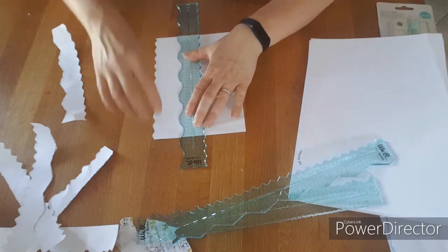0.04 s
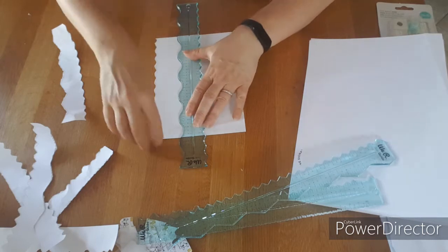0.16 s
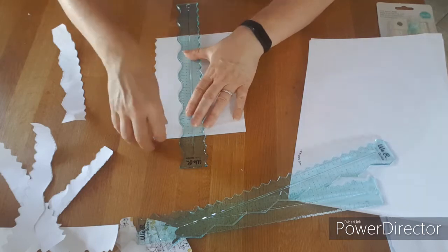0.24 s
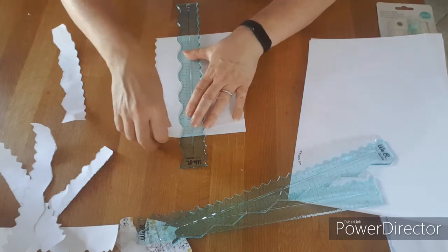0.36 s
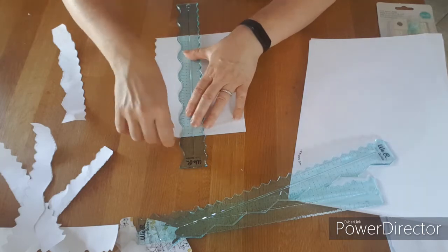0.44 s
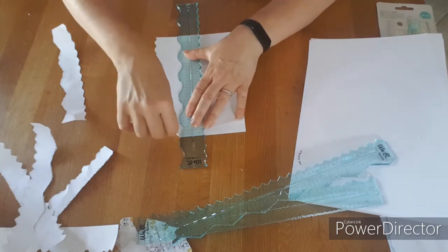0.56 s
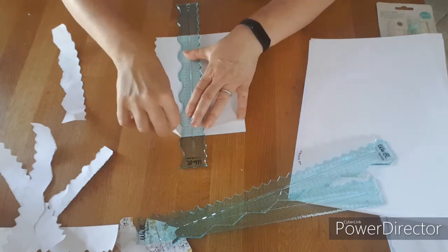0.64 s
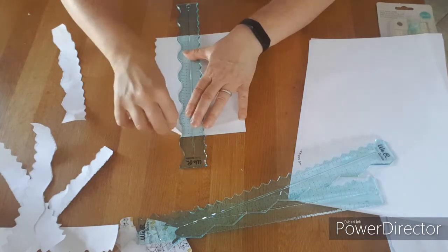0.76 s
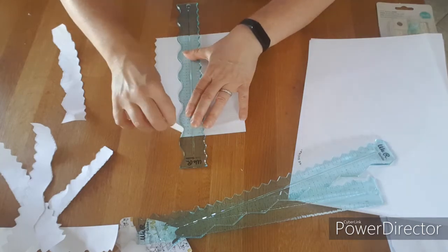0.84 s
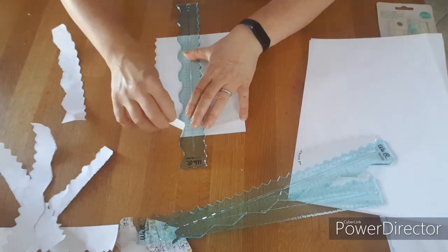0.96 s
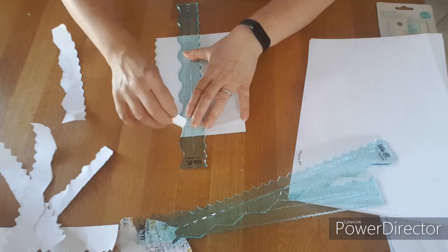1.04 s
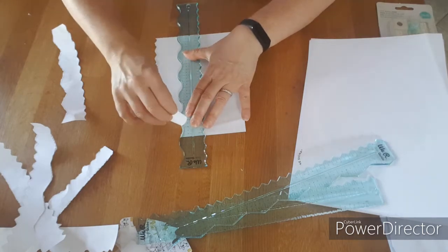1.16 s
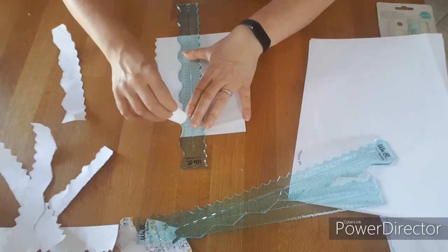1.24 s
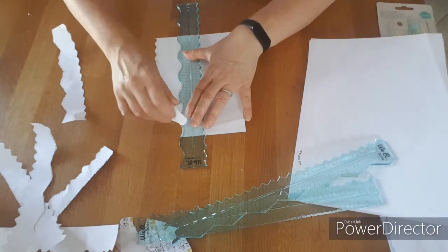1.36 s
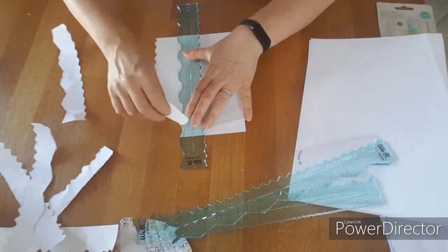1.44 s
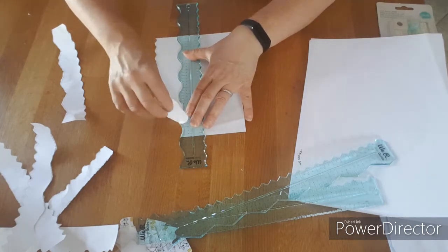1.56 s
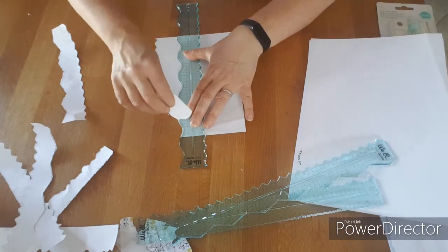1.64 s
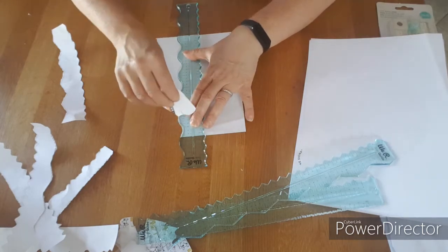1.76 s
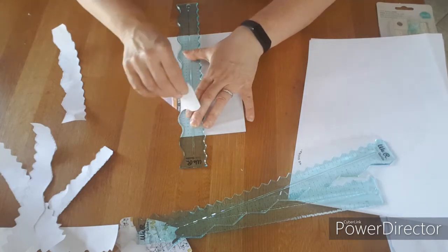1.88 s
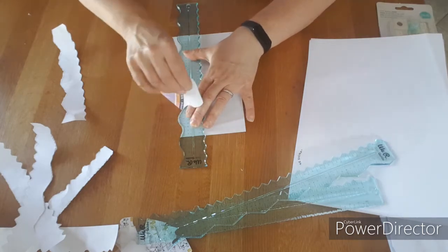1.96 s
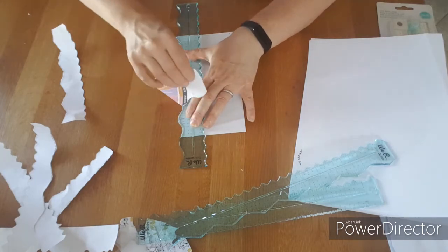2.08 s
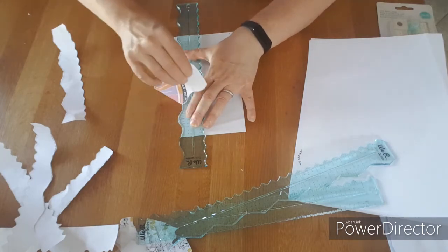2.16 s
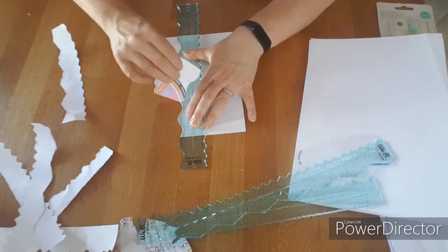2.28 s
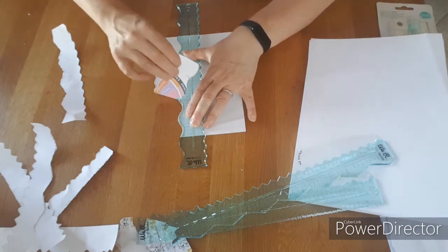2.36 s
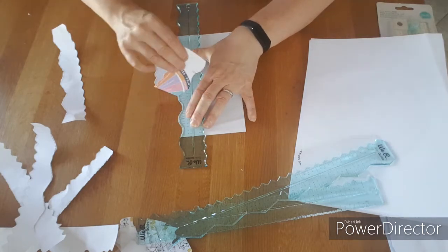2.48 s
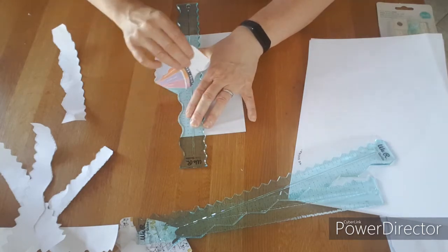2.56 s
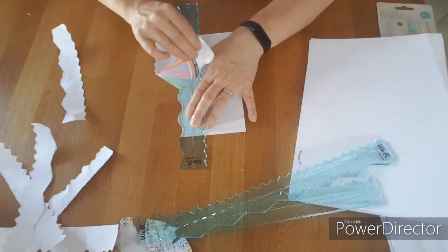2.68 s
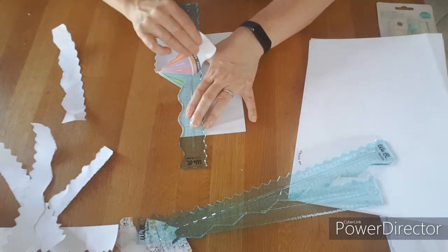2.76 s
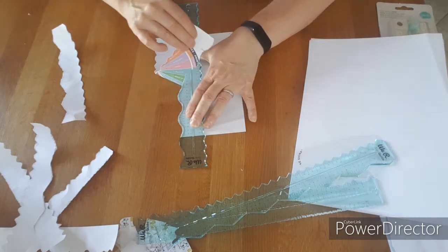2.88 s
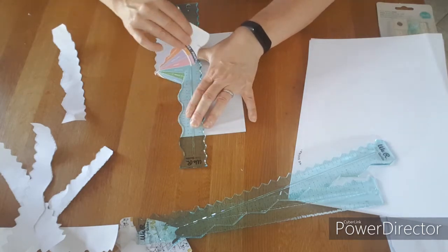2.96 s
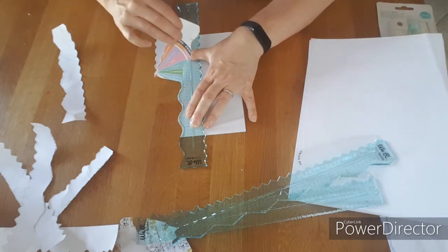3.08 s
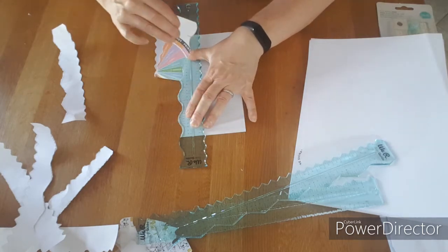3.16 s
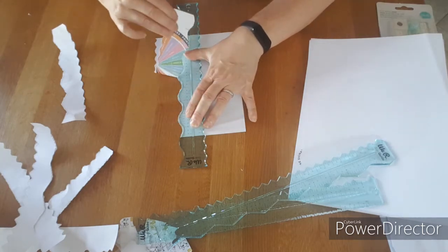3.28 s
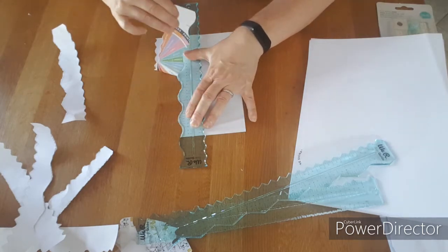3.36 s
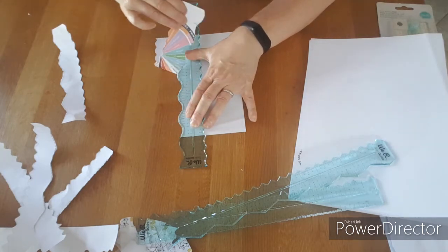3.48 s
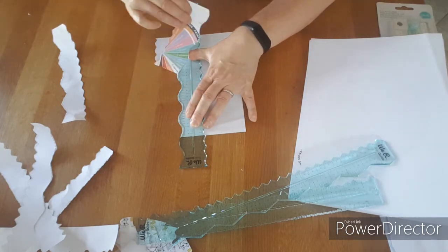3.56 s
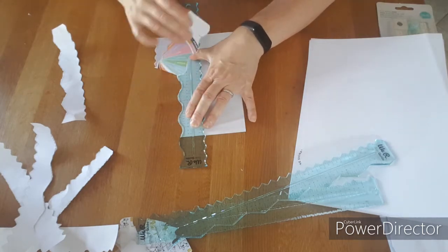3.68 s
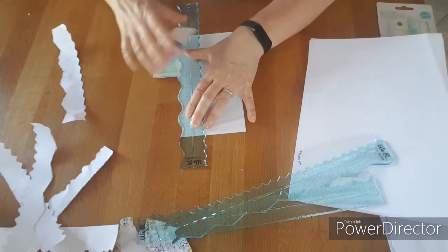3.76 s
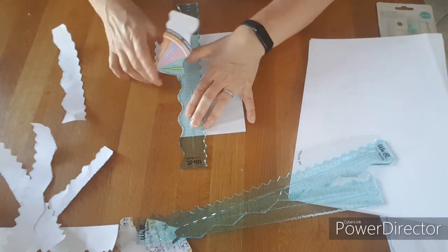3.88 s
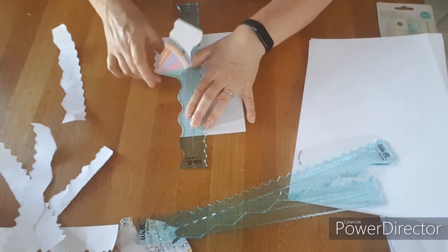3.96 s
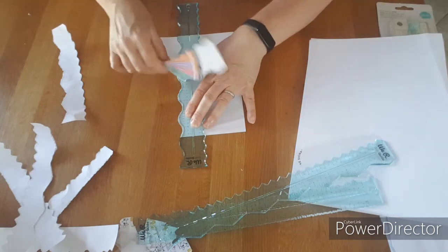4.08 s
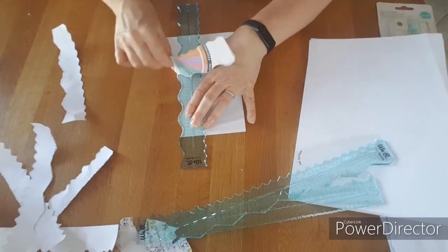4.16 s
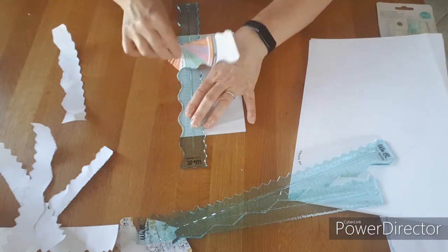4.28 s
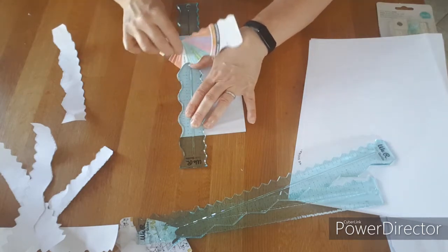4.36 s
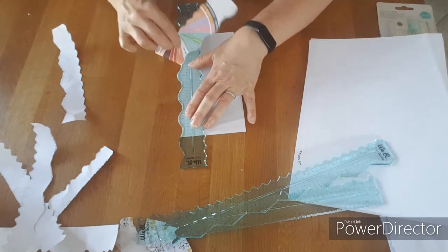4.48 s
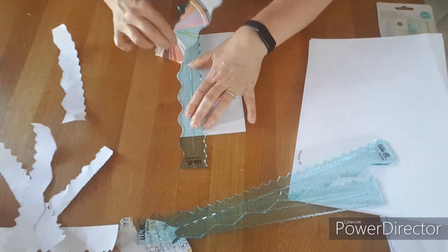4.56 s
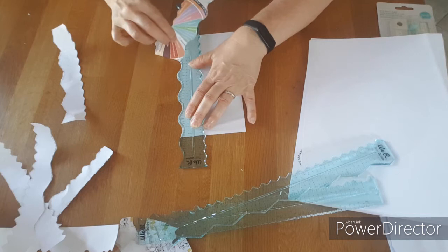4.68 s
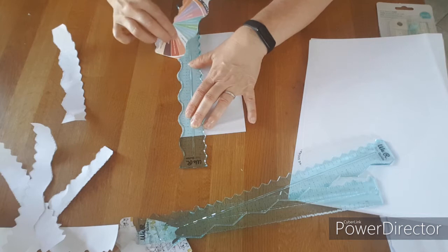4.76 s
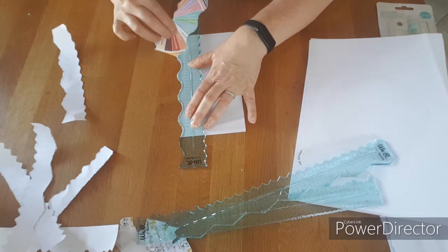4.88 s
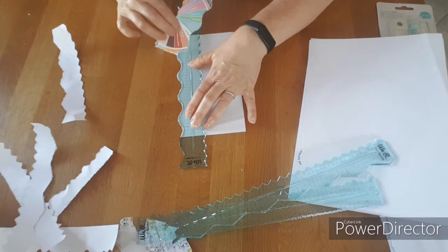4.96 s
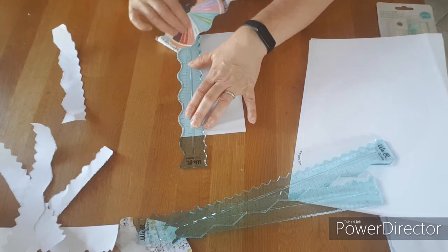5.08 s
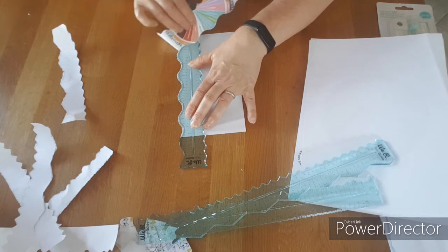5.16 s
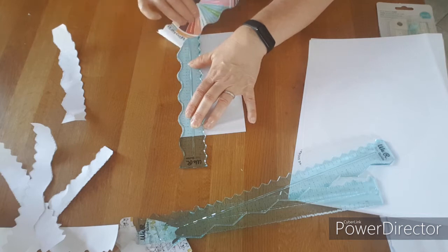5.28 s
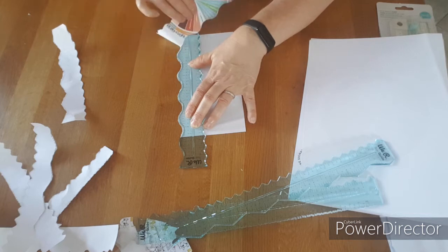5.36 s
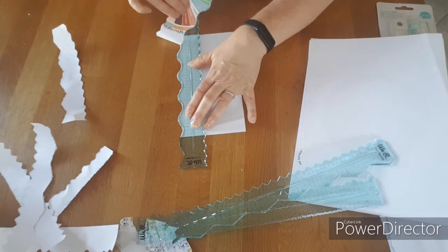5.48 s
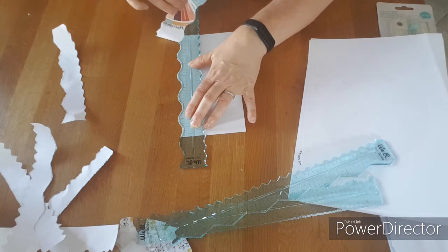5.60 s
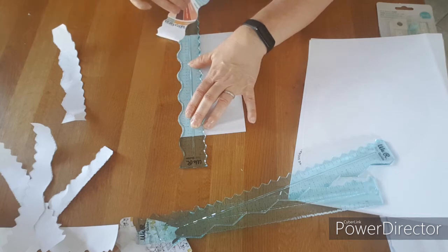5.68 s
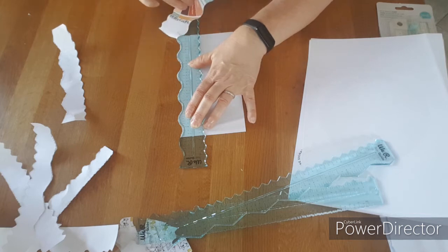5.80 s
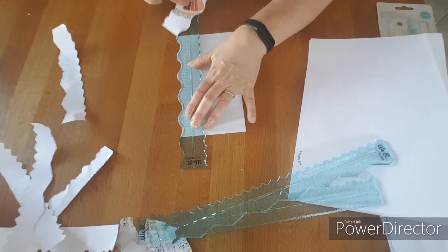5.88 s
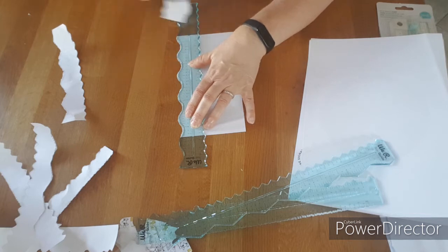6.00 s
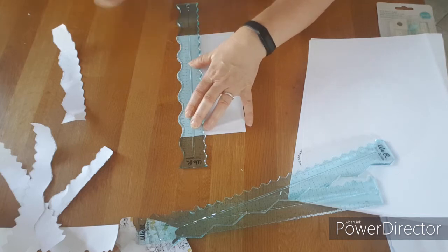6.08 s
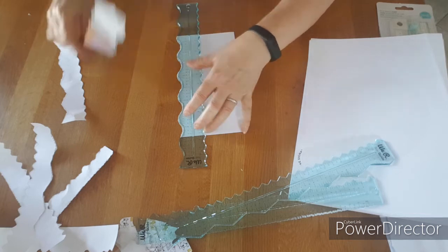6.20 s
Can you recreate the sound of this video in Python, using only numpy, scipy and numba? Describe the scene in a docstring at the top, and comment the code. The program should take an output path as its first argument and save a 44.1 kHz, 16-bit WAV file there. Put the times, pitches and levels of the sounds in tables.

```python
"""At a wooden table in a quiet room, a sheet of paper is lifted and torn along a wavy ruler in two pulls.
Breaking fibres are bursts of noise that ring the bent flap through wandering band-pass filters.
The flap buckles with ringing clicks, and its curl holds short narrow notes of filtered noise.
Finger taps ring decaying sines in the table top, which also shakes with low noise.
Banded noise makes the low room rumble, and a decaying noise echo makes the short tail."""
import sys
import numpy as np
from scipy import signal
from scipy.fft import rfft, irfft, next_fast_len
from scipy.io import wavfile
from numba import njit

SR = 44100
rng = np.random.default_rng(int(sys.argv[2]) if len(sys.argv) > 2 else 0)


def int16_out(signal):
    """Quantize to a 16-bit WAV file."""
    q = np.round(np.clip(np.atleast_2d(signal).T, -1, 1) * 32767)
    wavfile.write(sys.argv[1], SR, q.astype(np.int16))


N = 274919  # samples


def undb(db):
    """Amplitude ratio of a level in dB."""
    return 10 ** (np.asarray(db) / 20)


def unit(x):
    """Scale to an rms of 1."""
    return x / np.sqrt(np.mean(x ** 2))


def curves(table):
    """Join the points of each column by straight lines over the whole scene."""
    s, *columns = np.transpose(table)
    return [np.interp(np.arange(N) / SR, s, c) for c in columns]


@njit
def svf(x, hz, share):
    """State-variable band-pass with a moving centre, gain 1 at the centre."""
    y = np.empty(len(x))
    band_state, low_state = 0., 0.
    for i in range(len(x)):
        g = np.tan(np.pi * hz[i] / SR)
        v = (band_state + g * (x[i] - low_state)) / (1 + g * (g + share))
        band_state = 2 * v - band_state
        low_state += 2 * g * v
        y[i] = share * v
    return y


def band(x, hz, share):
    """Band-pass at a fixed or moving centre; share is the bandwidth over the centre."""
    centre = np.clip(hz * np.ones(len(x)), 20, .45 * SR)
    return svf(x + 1e-18, centre, float(np.clip(share, .02, 2)))


def walk(rate):
    """Random levels at uneven moments, about rate a second, joined by straight lines; spread near 1."""
    count = int(3 * rate * N / SR)
    gap = rng.random(count) + .5
    value = rng.standard_normal(count)
    return 1.25 * np.interp(np.arange(N) / SR, np.cumsum(gap) / rate, value)


def hops(rate):
    """Random values, each held until the next random moment."""
    return rng.standard_normal(N + 1)[np.cumsum(rng.random(N) < rate / SR)]


SPREAD_HZ = 1600  # above this the ports hear different stretches of the tear


def pair():
    """Noise at the two ports: alike in the bass, partly different in the treble."""
    mid, side = rng.standard_normal((2, N))
    side = signal.sosfilt(signal.butter(1, SPREAD_HZ, "high", fs=SR, output="sos"), side)
    return mid + 0.84 * side * np.array([[1], [-1]])


# Tone of the quiet room: (frequency [Hz], relative level per Hz [dB])
ROOM_TONE = [(20, -4), (35, -8), (60, -43), (110, 3.5), (200, -5.5), (320, -2), (600, -15.5), (1300, -16.5),
             (3500, -34), (6000, -51), (16000, -40)]
ROOM_DB, ROOM_PAN_DB = -62, -1.5  # rms before panning; left minus right


def room_noise():
    """Half-octave bands that waver a little; the bass is nearly the same at both ports."""
    room = 0
    tone_hz, tone_db = np.transpose(ROOM_TONE)
    for hz in 25 * 2 ** np.arange(0, 9.4, .5):
        mid, side = (band(band(rng.standard_normal(N), hz, .45), hz, .45) for _ in range(2))
        db = np.interp(np.log(hz), np.log(tone_hz), tone_db) + 2 * walk(6)
        width = min(0.44 + hz / 4000, 1)
        room = room + undb(db) * (mid + width * side * np.array([[1], [-1]]))
    pan = undb(np.array([[ROOM_PAN_DB], [-ROOM_PAN_DB]]) / 2)
    return undb(ROOM_DB) * unit(room) * pan


# The table top shakes under the hands: (time [s], level [dB])
TABLE_SHAKE = [(0.0, -81), (0.42, -72.5), (0.95, -55.5), (1.39, -70), (1.66, -58), (3.85, -68), (4.09, -64),
               (4.6, -62), (5.92, -59.5), (6.23, -71)]


def table_shake():
    """The hands shake the table top: noise around its lowest mode follows a level curve."""
    shake = unit(band(rng.standard_normal(N), TABLE_MODES[0][0], 0.97))
    return undb(curves(TABLE_SHAKE)[0]) * shake


# Strength of the tear, in parts that each start afresh: (time [s], level of the middle flap modes [dB],
# level of the two low modes [dB], level of the treble [dB]), the last two relative to the first
PULL_PARTS = [
    [(0.105, -80.5, -11, 3.5), (0.113, -68, 14, -19), (0.125, -76, 19, -4), (0.311, -74, 0, 8),
     (0.319, -57.5, 0, -3), (0.353, -67.5, -18, -5), (0.427, -69, -10, 8), (0.435, -62.5, -7, -10),
     (0.467, -64.5, -17, 1), (0.509, -52, -12, -5.5), (0.663, -58, 0, 7), (0.715, -51, -5, 4),
     (0.771, -52.5, -2, 8.5), (0.815, -47.5, -3.5, 5.5), (0.867, -52.5, -4, 7), (0.967, -47.5, -4.5, 5.5),
     (1.015, -57.5, -3, 6), (1.08, -47.5, 1.5, 5)],
    [(1.092, -43, 5, -19), (1.114, -52, -5, 4), (1.146, -55, 8, -1), (1.154, -43.5, -9, -14),
     (1.168, -51.5, 3, -2), (1.216, -51.5, 1.5, 3), (1.282, -61.5, 8.5, -7), (1.31, -60.5, -6, 1),
     (1.368, -68, -1, 4), (1.39, -53, -3, -10)],
    [(1.401, -50, -11, -13), (1.405, -65, 4, -11), (1.415, -48, 14, -26), (1.457, -64, 0, -13),
     (1.492, -55, 1, -1)],
    [(1.497, -49, 0, 9), (1.533, -45, -3, 0), (1.555, -46.5, 2, 3), (1.711, -50.5, 1, 8.5),
     (1.813, -44.5, -1.5, 5.5), (1.927, -43.5, -3.5, 4.5), (2.049, -44.5, -7, -0.5), (2.081, -45, -12, 5.5),
     (2.093, -62.5, 7, 13), (2.109, -43.5, 1, 3), (2.141, -58.5, -5, 7), (2.157, -45, -2, 3.5),
     (2.221, -52.5, -0.5, 2.5), (2.265, -42.5, -5, 0), (2.319, -50.5, 1.5, 8.5), (2.367, -54, 0, 7),
     (2.409, -38.5, -7.5, 1), (2.427, -44, -0.5, 0), (2.459, -42.5, -16, 2.5), (2.495, -34, -13.5, -7),
     (2.529, -39, -0.5, -1), (2.615, -42, 0.5, 5), (2.737, -46, 1, 1.5), (2.877, -47, -1.5, 2.5),
     (2.883, -41, 1, -1), (2.909, -54, 0, 5), (2.953, -43, -7, 1), (2.985, -54.5, -3, 5),
     (3.001, -40.5, -2, 0.5), (3.055, -47.5, -4, 0), (3.065, -59, 5, 8), (3.081, -35.5, -5, -8),
     (3.093, -51.5, -1, 5), (3.115, -41.5, -4, 2.5), (3.141, -46, -4, 2), (3.297, -45, -6.5, 5),
     (3.351, -39.5, -2.5, -3.5), (3.377, -52.5, 0, 2), (3.415, -35, -7, -8), (3.427, -46, -12, -1)],
    [(3.432, -34.5, -5, 3), (3.456, -40, 3, -7), (3.472, -49.5, 1, -6.5), (3.706, -66, -5.5, 6.5),
     (3.722, -55, -2, 2), (3.744, -70.5, 3, -1), (3.884, -75, 1, -3), (3.892, -60, -15, 2),
     (3.94, -76, 0, 4), (3.952, -57, -5, -6), (3.968, -63, 5, 1), (4.056, -61.5, -13, -0.5),
     (4.105, -83, 13, -2)],
    [(4.121, -44, 3, -6), (4.131, -38, -5.5, -4), (4.181, -44.5, 0.5, 0.5), (4.263, -41, 0.5, 3.5),
     (4.279, -45, 5.5, 7.5), (4.299, -41.5, 5, 7.5), (4.345, -46.5, -1.5, 2), (4.385, -47, 4.5, 9),
     (4.503, -45.5, -2.5, 6), (4.529, -50.5, 2, 7), (4.683, -47, -4.5, 5.5), (4.697, -52.5, -2.5, 5),
     (4.743, -48.5, -10.5, 5.5), (4.765, -53.5, -4, 8), (4.789, -45.5, -8.5, 5.5),
     (4.835, -45.5, -8.5, 4.5), (4.913, -39, -9, -2), (4.923, -46, -3.5, 0.5), (4.969, -49.5, -3, 0),
     (4.995, -46.5, 2.5, 5.5), (5.051, -39.5, -4.5, 1.5), (5.101, -45, 2, 3), (5.183, -44.5, 2, 1),
     (5.311, -42, -5.5, -4), (5.333, -51, -2, 4.5), (5.429, -43, -10.5, -2.5), (5.455, -49, -7, 1),
     (5.485, -40.5, -11, -3), (5.527, -46, -6, 1.5), (5.547, -42, -6.5, 0.5), (5.583, -54, -3, 3.5),
     (5.603, -41, -3, 1.5), (5.623, -45.5, -7, -4), (5.777, -42.5, -7.5, 7), (5.817, -44, 2, 9.5),
     (5.869, -60, 1, -9), (5.885, -45.5, -4, -2), (5.895, -55.5, 1, -2), (5.951, -58.5, 1, 0),
     (5.957, -52, -1, -12)],
    [(5.971, -43, -8, -7), (5.979, -52.5, 4, -7), (6.065, -60.5, 3, -5), (6.223, -66.5, 3, -2),
     (6.23, -76, 8, 17)],
]


def pull():
    """Level curves of the pull; each part holds its last values until the next one starts."""
    t = np.arange(N) / SR
    levels = np.zeros((len(PULL_PARTS[0][0]) - 1, N))
    for k, part in enumerate(PULL_PARTS):
        since = t >= (part[0][0] if k else 0)
        levels[:, since] = np.array(curves(part))[:, since]
    return levels


# The flap at rest, belly, low, mid, upper and high mode: (pitch [Hz], level before its group is balanced [dB])
FLAP_REST = [(580, -6), (1600, -1), (3000, -1.5), (4330, -5.5), (6700, -3)]
# Moments when the bending flap moves one mode and swells or fades it:
# (middle time [s], length [s], pitch [Hz], swell before its group is balanced [dB])
FLAP_SWELLS = [(0.14, 0.071, 970, 0), (0.67, 0.76, 1870, -5), (0.83, 0.19, 5900, 6), (1.5, 0.09, 1150, 17),
               (1.428, 0.069, 1190, 22), (1.566, 0.28, 1100, 2), (1.1, 0.11, 480, 1), (2, 0.23, 1510, -16),
               (1.83, 0.136, 800, 4), (2, 0.097, 1400, 7), (2.18, 0.33, 1810, -2.5), (1.1, 0.067, 1940, -3),
               (1.297, 0.18, 1060, 7), (1.197, 0.07, 3200, 14), (3.298, 0.1, 1720, 0),
               (5.6, 0.048, 1110, 5), (5.446, 0.1, 3150, -2), (7.9, .1, 6500, -3.5),
               (1.906, 0.71, 6530, 7.5), (1.87, 1, 4400, 7.5), (2.22, 0.69, 440, -3.5),
               (2.517, 0.13, 4100, 9), (2.72, 0.47, 1510, 9), (2.67, 0.35, 6770, 7.5),
               (3.01, 0.29, 2220, 4.5), (2.3, 0.34, 2850, 12), (3.03, 0.43, 3715, -8),
               (3.05, 0.63, 6400, -3), (3.35, 0.244, 940, -4.5), (3.446, 0.055, 620, 7),
               (3.387, 0.34, 2400, 6.5), (4.308, 0.61, 1580, 1.5), (4.31, 0.073, 520, -6),
               (4.384, 0.091, 580, 0), (5.1, 0.13, 3700, 9), (4.25, 0.14, 3200, 4), (6.9, 0.1, 2400, -5),
               (4.676, 0.22, 3300, 17), (4.898, 0.15, 3450, 27), (5.195, 0.46, 1950, 9.5),
               (5.18, 0.34, 900, 5.5), (5.247, 0.31, 3370, 16), (5.51, 0.39, 1430, -3.5),
               (5.683, 0.84, 860, 0), (5.782, 0.51, 7000, 10), (5.4, 0.069, 1100, 23), (5.7, 0.25, 1650, 4)]


def bending():
    """Pitch and level of each flap mode: a swell draws the nearest mode to its pitch and lifts or fades it."""
    t = np.arange(N) / SR
    rest_hz, rest_db = np.transpose(FLAP_REST)
    hz, db = np.outer(rest_hz, np.ones(N)), np.outer(rest_db, np.ones(N))
    for s, length_s, swell_hz, swell_db in FLAP_SWELLS:
        mode = np.argmin(np.abs(np.log(rest_hz / swell_hz)))
        bump = np.cos(np.pi * np.clip((t - s) / length_s, -.5, .5)) ** 2
        hz[mode] += np.minimum(5.9 * bump, 1) * (swell_hz - hz[mode])  # the pitch arrives before the peak
        db[mode] += swell_db * bump
    return hz, db


def share_out(db, total_db):
    """Levels of a group of modes, scaled so that their power adds up to a total."""
    return db - 10 * np.log10(np.sum(undb(2 * db), axis=0)) + total_db


def slips(rate, spread_db, fade_s):
    """Random slips, some larger than the rest: their first cracks, and the rustle that fades after each."""
    when = rng.random(N)
    size = np.minimum(rng.exponential(size=N), 3)
    cracks = (when < rate / SR) * undb(spread_db * size)
    energy = signal.lfilter([1], [1, -np.exp(-2 / (fade_s * SR))], cracks ** 2)
    return unit(cracks), unit(np.sqrt(energy))


# Ring of each flap mode, belly to high: bandwidth per filter [share of the centre]
RING_WIDTH = 0.66, 0.36, 0.4, 0.079, 0.73
# Broad hump under each mode, belly to high: bandwidth per filter [share of the centre]
BROAD_WIDTH = 1, 1, 1, 0.88, 1.0
HOP_SHARE, HOPS_PER_S = .07, 35  # rms hop as a share of the pitch; mean rate


def flap_modes(mode_hz, mode_db, cracks, rustle, ticks, fizz):
    """Breaking fibres shake the flap modes, which hop about their pitches as the crease moves."""
    flap = 0
    for hz, db, share, broad in zip(mode_hz, mode_db, RING_WIDTH, BROAD_WIDTH):
        breaks = .65 * cracks + .22 * ticks + (rustle + .6) * (pair() + .6 * fizz)
        breaks = breaks * undb(1.68 * walk(50))
        centre = hz * (1 + HOP_SHARE * hops(HOPS_PER_S))
        # a broad hump with a sharper ring on top
        hump = np.array([band(band(b, hz, broad), hz, broad) for b in breaks])
        ring = np.array([band(b, centre, share) for b in hump])
        flap = flap + undb(db) * unit(unit(ring) + 1.45 * unit(hump))
    return flap


FIBRE_HZ, FIBRE_WIDTH_HZ = 12620, 11000  # width of the second of two filters


def fibre_hiss(cracks, rustle, ticks, fizz):
    """The breaking fibres' own treble: cracks and rustling noise through two wide bands."""
    rustling = (rustle + .65) * (pair() + .45 * fizz) * undb(1.1 * walk(25))
    breaks = .8 * cracks + .5 * ticks + rustling
    share = FIBRE_WIDTH_HZ / FIBRE_HZ
    return unit(np.array([band(band(b, FIBRE_HZ, 0.96), FIBRE_HZ, share) for b in breaks]))


FIBRE_DB = 0.5  # weight against the high flap mode, before the two are balanced
TICK_HZ, TICK_DB = 5500, -10.5  # lone ticks heard straight from the tear, before firmness and pull


def tearing():
    """Fibres break in random slips that hiss, tick and shake the flap, all following the pull."""
    level_db, low_db, treble_db = pull()
    mode_hz, mode_db = bending()
    high_db, fibre_db = share_out(np.array([mode_db[4], np.full(N, FIBRE_DB)]), treble_db)
    mode_db = [*share_out(mode_db[:2], low_db), *share_out(mode_db[2:4], 0), high_db]
    cracks, rustle = slips(560, 2.1, .002)
    # a slack sheet only whispers; slips stand out once the pull is firm
    firm = np.clip((level_db + 66) / 14, 0, 1)
    cracks, rustle = firm * cracks, firm * rustle + 1 - firm
    fizz, _ = slips(2500, 4.2, .001)  # single fibres
    lone, _ = slips(150, 3.0, .001)
    ticks = firm * lone  # thicker fibres part with a lone tick
    flap = flap_modes(mode_hz, mode_db, cracks, rustle, ticks, fizz)
    fibres = undb(fibre_db) * fibre_hiss(cracks, rustle, ticks, fizz)
    straight = undb(TICK_DB) * firm * unit(band(ticks, TICK_HZ, 2))
    held = notes(0.44 * cracks + (rustle + .8) * rng.standard_normal(N))
    return dips() * undb(level_db) * (flap + fibres + held + straight)


DIP_DB, DIP_S = -5.5, 0.006  # deepest gain and length of a dip


def dips():
    """The tearing noise dips for 6 ms before each single buckle, so its attack stands out."""
    marks = np.zeros(N)
    marks[[int(row[0] * SR) for row in SINGLE_BUCKLES]] = 1
    depth = np.linspace(1, 0, int(DIP_S * SR)) ** .5
    ahead = np.convolve(marks[::-1], depth)[:N][::-1]  # run backwards, to lead up to each buckle
    return undb(DIP_DB * np.clip(ahead, 0, 1))


# Single buckles of the paper: (time [s], peak level [dB], ring [Hz], bright part in the mix of rings [dB])
SINGLE_BUCKLES = [(0.112, -45, 1140, -23), (0.319, -43, 1890, -25), (0.473, -45, 3410, -10),
                  (0.555, -41, 3300, 0), (0.576, -35, 3100, -9), (0.665, -45, 1960, -3),
                  (0.597, -31.5, 2800, -21), (0.708, -29, 4760, -10), (0.876, -32, 4160, -10),
                  (0.908, -26, 4800, -2), (0.979, -29.5, 2360, -9), (1.029, -38, 3110, -12),
                  (1.232, -35, 2560, -20), (1.749, -37, 4500, -10), (2.066, -24, 5950, -5),
                  (1.055, -30, 3250, -11), (1.086, -23.5, 1120, -19), (1.155, -22, 3480, -10),
                  (1.395, -24.5, 1030, -18), (1.414, -26, 1120, -18), (1.499, -41, 1070, -13),
                  (1.552, -30, 1070, -16), (1.921, -21, 4440, -12), (2.109, -26.5, 4480, -13),
                  (2.156, -26, 3000, -12), (2.245, -30, 3560, -10), (2.311, -33, 2000, -8),
                  (2.39, -31, 3450, -11), (2.405, -23, 2640, -5), (2.479, -30, 4460, -12),
                  (2.492, -25, 4300, -9), (2.617, -30, 1490, -3), (2.805, -27, 2800, -5),
                  (2.963, -33, 2670, -18), (3.003, -30, 3700, -18), (3.013, -36, 3520, -13),
                  (2.881, -24.5, 3060, -16), (2.993, -26, 2900, -8), (3.026, -35, 3040, -10),
                  (3.049, -31, 2920, -16), (3.078, -19.5, 2800, -6), (3.111, -27, 3660, 5),
                  (3.188, -24.5, 3570, -14), (3.289, -26.5, 2500, -15), (3.401, -31, 2550, -11),
                  (3.41, -28, 2400, -18), (3.419, -25, 3500, -4), (3.429, -23, 2940, -13),
                  (3.438, -19.5, 3120, -11), (3.453, -18.5, 2650, -11), (3.72, -36, 2580, -19),
                  (3.798, -44.5, 2800, -25), (3.833, -48, 2010, -25), (3.894, -39, 2920, -17),
                  (3.954, -32.5, 2480, -23), (4.116, -11, 2940, -1.5), (4.144, -26, 2480, -19),
                  (4.293, -27, 1570, -15), (4.43, -30, 1950, -13), (4.482, -31.5, 1340, -13),
                  (4.553, -35, 3080, -18), (4.706, -35, 3660, -11), (4.728, -32, 3330, -11),
                  (4.788, -35, 3300, -11), (4.85, -27, 3800, -11), (4.864, -23.5, 3670, -14),
                  (5.033, -23, 3370, -12), (5.162, -26, 1790, -21), (5.3, -28, 3740, 9),
                  (5.423, -26.5, 2980, -8), (5.478, -22, 3220, -9), (5.487, -25, 2770, -14),
                  (5.541, -34, 1440, -16), (5.605, -21, 3900, 0), (5.625, -27, 2600, -12),
                  (5.707, -22.5, 3020, -12), (5.72, -25, 3000, -6), (5.745, -23, 3000, -1),
                  (5.769, -19, 3040, -4), (5.789, -19, 3220, 1), (5.812, -29.5, 1060, -9),
                  (5.826, -20, 4500, -10), (5.881, -26, 3770, -18), (5.964, -20, 2310, -36),
                  (5.966, -26, 1070, -30), (5.964, -19, 4130, -17), (2.852, -26.5, 2280, -8),
                  (3.274, -25, 5000, 2), (5.326, -32, 5000, 3), (3.222, -29, 2500, -8),
                  (3.346, -27, 2500, -8)]
# Runs of small buckles at random moments: (start time [s], end time [s], count,
# middle of the random peak levels [dB], pitch that is lowered at random for each ring [Hz])
BUCKLE_RUNS = [(1.5, 1.62, 5, -34, 1500), (3.09, 3.16, 5, -28, 3000), (5.68, 5.8, 14, -29, 3600)]


def buckles():
    """The single buckles, then the runs, scattered in time, size and pitch."""
    rows = list(SINGLE_BUCKLES)
    for start, end, count, db, hz in BUCKLE_RUNS:
        for k, (late, size, pitch) in enumerate(rng.random((count, 3))):
            s = start + (end - start) * (k + late) / count
            rows.append((s, db + 6 * (size - .5), hz * (0.74 + 0.15 * pitch), -5.0))
    return rows


def snaps():
    """Each buckle is a sharp broad click and a few ms of rattle, ringing at its own pitch with a bright part."""
    out, t = np.zeros(N + 2000), np.arange(2000) / SR
    rows = buckles()
    for (s, db, hz, bright_db), noise in zip(rows, rng.standard_normal((len(rows), 2000))):
        kick = 0.079 * noise * np.exp(-t / 0.0038)
        kick[0] += 1
        # (centre [Hz], bandwidth [share of the centre], level in the mix [dB])
        parts = ((hz, .4, -2.5), (hz, 1.8, -.1), (3.33 * hz, .7, -8), (hz / 2.2, .45, -10),
                 (8500, 1.3, bright_db))
        snap = 0
        for part_hz, share, part_db in parts:
            ring = band(band(kick, part_hz, 2), part_hz, share)
            snap = snap + undb(part_db) * ring / np.max(np.abs(ring))
        out[int(s * SR):][:2000] += undb(db) * snap / np.max(np.abs(snap))
    return out[:N]


# Modes of the table top: (frequency [Hz], relative level [dB], time to fall 60 dB [s])
TABLE_MODES = [(121, 2.5, 0.083), (206.6, 3.5, 0.036), (350, 0, 0.018), (693, -10.5, 0.094)]
# Fingers on the table: (time [s], peak level of the ring [dB])
FINGER_TAPS = [(0.113, -40.5), (1.395, -61), (3.441, -38), (3.891, -40.5), (3.954, -42.5), (5.5, -49),
               (5.964, -57)]
SLIDE_HZ, SLIDE_DB, SLIDE_S = 300, -13.5, 0.043  # centre; start rms against the ring's peak; decay time


def taps():
    """A soft fingertip push rings the table top in decaying sines, and the fingertip slides on."""
    t = np.arange(SR // 2) / SR
    ring = 0
    for hz, db, t60 in TABLE_MODES:
        ring = ring + undb(db) * np.sin(2 * np.pi * hz * t) * np.exp(-np.log(1000) * t / t60)
    blows = np.zeros(N)
    for s, db in FINGER_TAPS:
        blows[int(s * SR)] = undb(db)
    slide = unit(band(rng.standard_normal(len(t)), SLIDE_HZ, 0.26)) * np.exp(-t / SLIDE_S)
    tap = ring / np.max(np.abs(ring)) + undb(SLIDE_DB) * slide
    return signal.fftconvolve(blows, tap)[:N]


# The curled flap holds a narrow note for a moment:
# (middle time [s], length [s], pitch [Hz], level against the pull before the fade in and out [dB])
CURL_NOTES = [(0.512, 0.14, 1820, -8.5), (0.527, .1, 2960, -10), (0.595, 0.095, 2900, -3),
              (0.5, 0.09, 4150, -10), (0.786, .08, 2700, -7), (1.55, .06, 1044, -3), (1.601, 0.09, 1230, 0),
              (1.569, 0.025, 435, -1), (1.627, .07, 618, -6.5), (1.784, 0.064, 1006, 1),
              (1.811, 0.1, 1550, -3.5), (1.822, 0.077, 1220, -3), (1.874, .06, 1030, -8.5),
              (2.65, 0.42, 1403, -3.5), (2.83, 0.13, 2820, -2), (2.88, .05, 3670, -5.5),
              (2.95, .06, 2950, -2), (3.02, 0.065, 3700, -3.5), (3.108, 0.078, 3680, -0.5),
              (3.096, 0.089, 2860, -5), (4.25, .1, 1440, -10), (4.3, .05, 1555, 5), (4.311, 0.065, 602, -2),
              (4.397, 0.099, 566, 2.5), (4.398, 0.059, 1380, 2), (4.413, 0.066, 1940, 1.5),
              (4.48, 0.13, 520, -8.5), (5.18, 0.089, 1935, -1), (5.176, 0.094, 774, -6.5),
              (2.49, 0.057, 4400, -3.5), (4.397, .1, 2450, -3), (4.43, 0.079, 3500, -4),
              (6.03, 0.078, 1600, -15), (6.167, 0.23, 1610, 2)]
NOTE_WIDTH = 0.083  # bandwidth of each of two filters, share of the pitch


def notes(breaks):
    """Narrow resonances of the curl, shaken by the breaking fibres, that come and go."""
    out, t = np.zeros(N), np.arange(N) / SR
    for s, length_s, hz, db in CURL_NOTES:
        now = np.abs(t - s) < length_s / 2
        ring = band(band(breaks[now], hz, NOTE_WIDTH), hz, NOTE_WIDTH)
        fade = np.cos(np.pi * (t[now] - s) / length_s)
        out[now] += undb(db) * fade * unit(ring)
    return out


TAIL_T60_S, TAIL_TREBLE_T60_S, TAIL_DB = .4, .25, -10  # times to fall 60 dB; echo energy


def tail(x):
    """Table and walls answer with a diffuse tail; the treble dies first and differs between the ports."""
    t = np.arange(SR // 2) / SR
    noise = pair()[:, :len(t)]
    low = signal.sosfilt(signal.butter(1, 3000, fs=SR, output="sos"), noise)
    echo = low * undb(-60 * t / TAIL_T60_S) + (noise - low) * undb(-60 * t / TAIL_TREBLE_T60_S)
    echo = echo * np.clip(t / .01, 0, 1)  # builds up over 10 ms
    echo = undb(TAIL_DB) * echo / np.sqrt(np.sum(echo ** 2) / 2)
    return signal.fftconvolve(x, echo, axes=1)[:, :N]


# Phase between the microphone ports: (frequency [Hz], lead of the left port [rad])
PORT_LEAD = [(0, 0), (6000, -.2), (9000, -2), (16000, -3.6)]


def ports(x):
    """The two microphone ports hear the treble in different phase."""
    size = next_fast_len(N)
    lead = np.interp(np.arange(size // 2 + 1) * SR / size, *np.transpose(PORT_LEAD))
    turn = np.exp(.5j * np.array([lead, -lead]))
    return irfft(rfft(x, size) * turn, size)[:, :N]


# Balance of the table sounds and their tail: (time [s], left minus right level [dB])
BALANCE = [(0, 1.5), (3, 1.8), (5.3, 1.8), (5.75, 3.5), (6.1, 1.5)]


def scene():
    """Paper and table with their tail, balanced between the ports, over the room noise."""
    near = tearing() + table_shake() + snaps() + taps()
    pan_db, = curves(BALANCE)
    pan = undb(np.array([pan_db, -pan_db]) / 2)
    return (ports(near) + tail(near)) * pan + room_noise()


TOP_HZ = 15900


def record(dry):
    """The phone cuts the top with a steep low-pass."""
    return signal.sosfilt(signal.ellip(10, .2, 80, TOP_HZ, fs=SR, output="sos"), dry)


dry = scene()
out = record(dry)
int16_out(out)
```